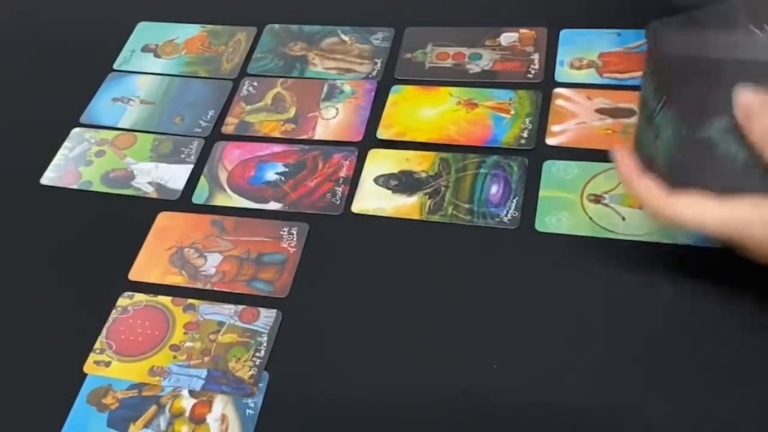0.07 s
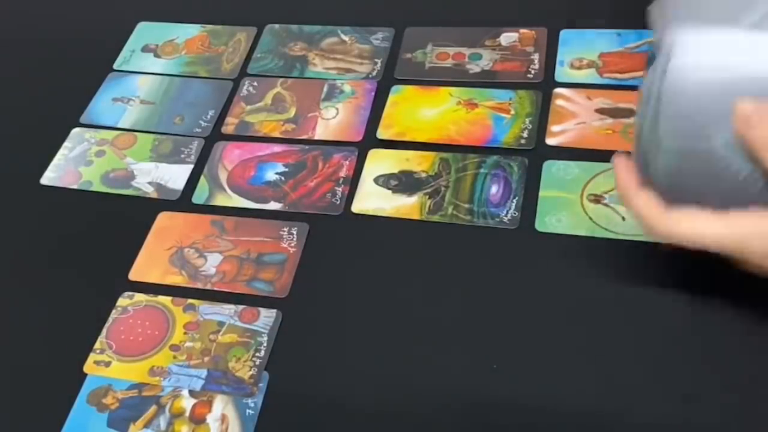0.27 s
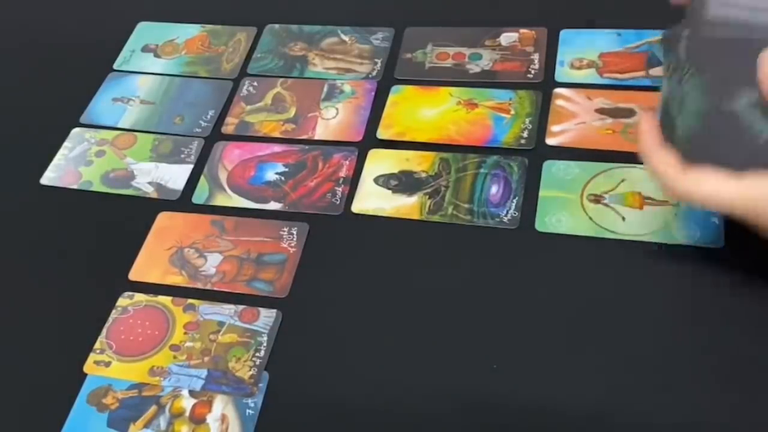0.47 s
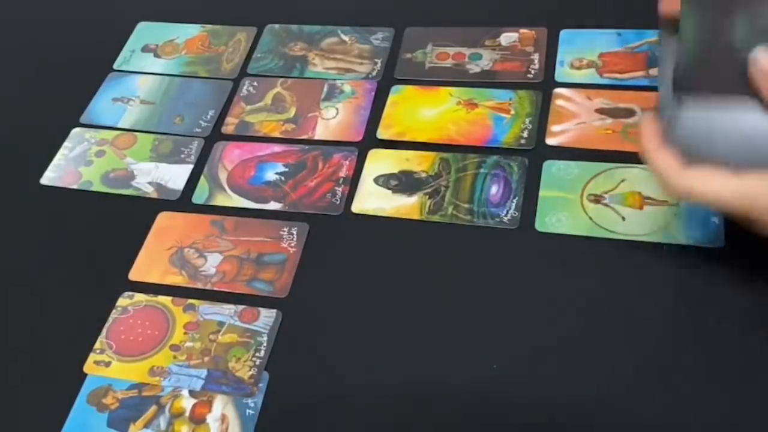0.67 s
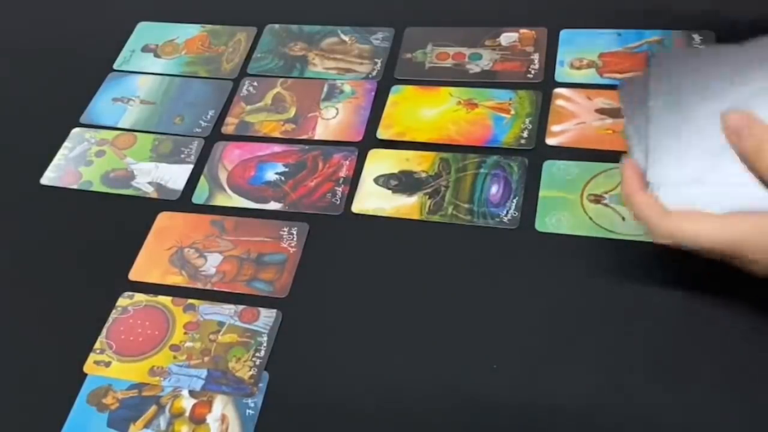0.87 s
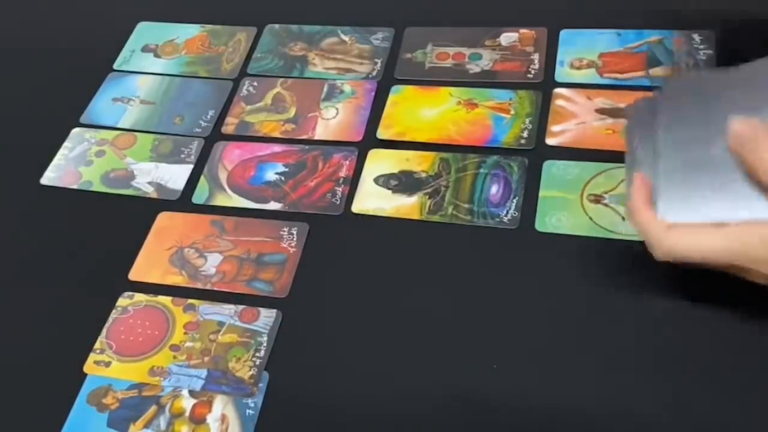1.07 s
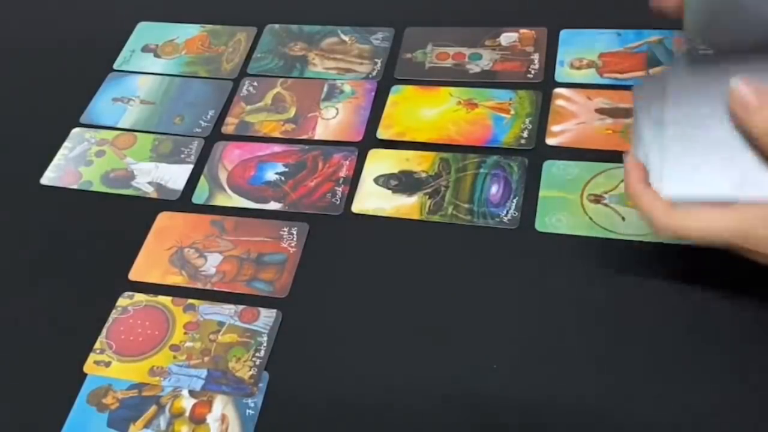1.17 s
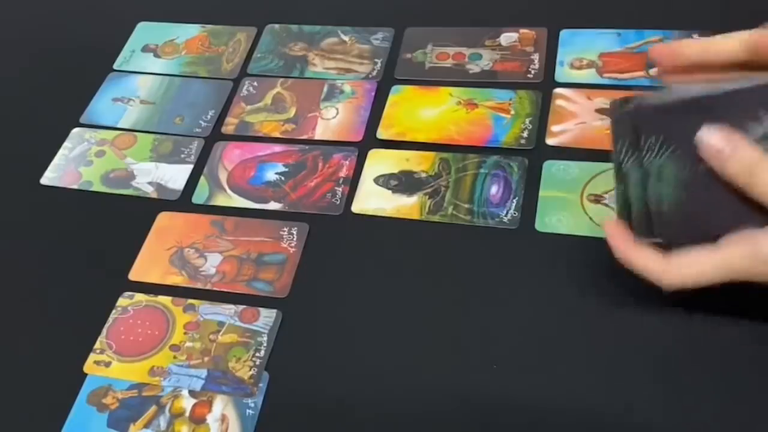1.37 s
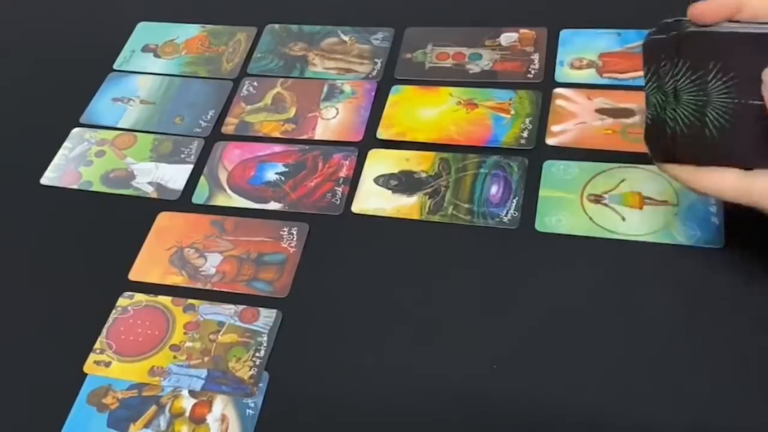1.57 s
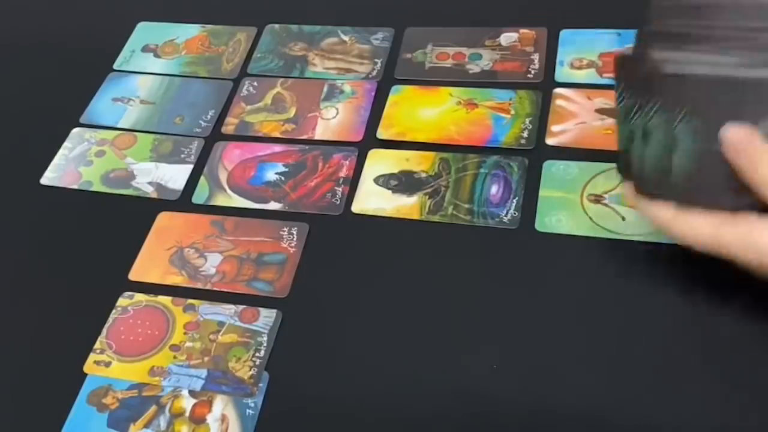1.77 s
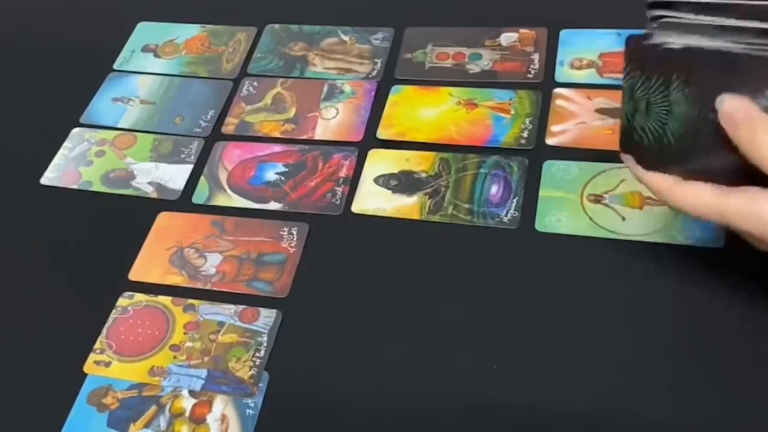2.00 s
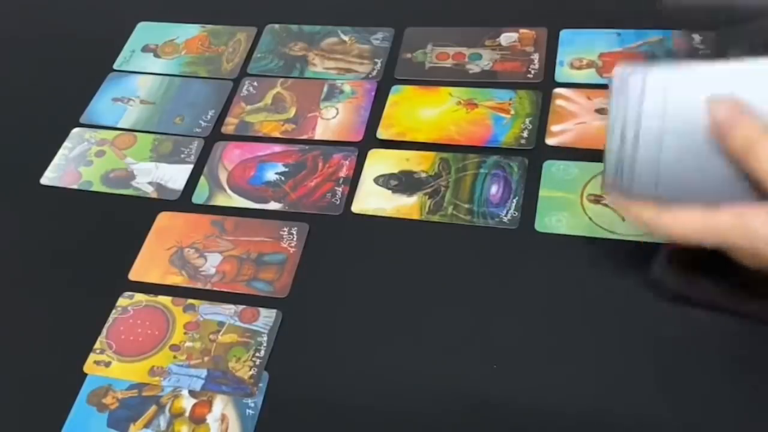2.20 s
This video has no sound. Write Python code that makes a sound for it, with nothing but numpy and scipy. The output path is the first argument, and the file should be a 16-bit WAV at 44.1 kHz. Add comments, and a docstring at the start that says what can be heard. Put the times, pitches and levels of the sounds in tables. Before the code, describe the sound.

Packets of tarot cards slide and snap in the hands, near the microphone in a quiet indoor room with a short reverberation and faint low hum; the deck is knocked together with low thuds at the end.

```python
"""Packets of tarot cards slide in a hand shuffle, close by, in a small quiet room: friction noise
made of dense tiny catches swells with each stroke. Card edges snap on the deck as decaying noise
bursts with damped rings. Near the end the deck is knocked together: dull modes, clatter, low thuds.
Slow pressure swings, a short diffuse room tail, a low rumble and a faint hum complete the scene."""
import sys
import numpy as np
from scipy import signal
from scipy.fft import rfft, irfft
from scipy.io import wavfile
from scipy.ndimage import uniform_filter1d

SR = 44100
rng = np.random.default_rng(int(sys.argv[2]) if len(sys.argv) > 2 else 0)


def pcm_store(signal):
    """Save signal as 16-bit PCM."""
    levels = np.round(np.clip(np.atleast_2d(signal), -1, 1) * 32767)
    wavfile.write(sys.argv[1], SR, levels.astype(np.int16).T)


N = 98739  # length in samples

# Friction: density, exponential level spread and power share of the catches
CATCHES_PER_S, CATCH_SPREAD_DB, CATCH_SHARE = 2500, 2.5, 0.22
# Depth and averaging time of the level flutter; exponent of the stroke envelope
FLUTTER_DB, FLUTTER_S, STROKE_SHAPE = 2.5, 0.014, 1.224

# Snaps: slower settling noise, first contact impulse, frequency where the spectral tilt levels off
SETTLE_S, SETTLE_DB, CONTACT_DB, TILT_TOP_HZ = 0.0027, -33.5, 7, 10040
# Packet ring: cycles to fall to 1/e, and time constant of its swell
RING_CYCLES, RING_RISE_S = 1.8, 0.00048

# Onset time constant of every mode; low-pass over the knocks; decay constant of the clatter
MODE_RISE_S, KNOCK_SOFT_HZ, RATTLE_S = 0.0007, 2560, 0.01

# Room: delay of the tail and level of each source sent into it
ROOM_DELAY_S, SNAP_ROOM_DB, SLIDE_ROOM_DB, KNOCK_ROOM_DB = 0.004, -12.5, -10, -20.5
FLOOR_DB, CUT_HZ = -60, 15950  # rms level of the rumble; upper band limit


def amp(db):
    """Level definition: decibels to an amplitude ratio."""
    return 10 ** (np.asarray(db) / 20)


def unit(x):
    """Power normalization: scales a signal to an rms of one."""
    return x / np.sqrt(np.mean(x ** 2) + 1e-20)


def read(points, hz):
    """Logarithmic frequency scale: interpolates a table between its points."""
    f, value = np.transpose(points)
    return np.interp(np.log(hz + 1), np.log(f), value)


def add(mix, s, sound):
    """Linear superposition: adds a sound to the mix from a given time in seconds."""
    part = mix[max(round(s * SR), 0):][:len(sound)]
    part += sound[:len(part)]


def colour(x, points):
    """Spectral shaping: weights a signal by frequency and returns it at an rms of one."""
    hz = np.fft.rfftfreq(len(x), 1 / SR)
    return unit(irfft(rfft(x) * amp(read(points, hz)), len(x)))


def causal(x, gain_db):
    """Minimum-phase filtering: the Hilbert transform of log gain gives a phase without pre-echo."""
    log_gain = np.log(amp(np.maximum(gain_db, -100)))
    circle = np.r_[log_gain, log_gain[-2:0:-1]]
    response = np.exp(np.conj(signal.hilbert(circle)))[:len(log_gain)]
    return irfft(rfft(x) * response)


def ring(db, hz, t60):
    """Damped resonance: one mode swells in briefly and decays exponentially by 60 dB in t60."""
    t = np.arange(SR // 2) / SR
    onset = 1 - np.exp(-t / MODE_RISE_S)
    return amp(db - 60 * t / t60) * np.sin(2 * np.pi * hz * t) * onset


def slides():
    """Dry friction: sparse catches and continuous noise share a power that follows each stroke."""
    # Strokes: peak t/s, rise to peak/s, fall to 1/e/s, hiss level/dB,
    # airy top re hiss/dB, rasp of the card body re hiss/dB (rise is also counted from 1/e)
    strokes = [(.033, 0.11, 0.017, -51, -19, -7.5), (0.101, 0.055, 0.019, -48.5, 2, -24.5),
               (.195, 0.061, 0.044, -68, 8, -6), (.24, 0.02, 0.022, -48.5, -6, -9.5),
               (.32, 0.032, 0.026, -53.5, 1, -14.5), (0.361, 0.0075, 0.0061, -57, 12.5, -40),
               (0.378, 0.025, 0.018, -50, 3.5, -35), (.425, 0.038, 0.023, -63, -10, -6.5),
               (0.462, 0.018, 0.011, -57, -0.5, -11), (.532, 0.012, 0.009, -45.5, -6, -2),
               (0.564, 0.017, 0.027, -57, -13, 3.5), (0.6, 0.019, 0.014, -38, -2, -21),
               (0.779, 0.0056, 0.02, -48.5, -1.5, -13), (0.807, 0.013, 0.026, -44.5, -3, -12.5),
               (0.846, 0.025, 0.026, -42.5, -7.5, -4), (1.056, 0.011, 0.039, -44.5, -7.5, 6),
               (1.251, 0.013, 0.025, -67.5, -5, -5), (1.299, 0.041, 0.031, -59, -5.5, -8.5),
               (1.417, 0.018, 0.013, -56.5, -1.5, -8.5), (1.484, 0.013, .01, -88, -13.5, 16.5),
               (1.562, 0.0238, 0.019, -58, 2, -5), (1.634, 0.059, 0.031, -52.5, -0.5, -42.5),
               (1.736, 0.0067, .01, -49, -2, -15), (1.757, 0.017, 0.04, -47.5, -2.5, -19.5),
               (1.801, 0.032, 0.031, -50, 0.5, 0.5), (1.862, 0.015, 0.035, -58, -8, 14),
               (1.896, 0.009, 0.016, -42, -5.5, -1.5), (1.978, .0063, 0.0034, -66.5, -2, 5.5),
               (2.015, 0.0079, 0.0096, -57, 5.5, -15), (2.1, 0.024, 0.031, -51.5, -2, 0),
               (2.147, 0.025, 0.023, -47.5, -9, -4.5), (2.178, 0.0097, 0.019, -45.5, -6, 5),
               (2.208, 0.02, 0.03, -49, -1, 1.5)]
    # Spectrum of the main hiss: f/Hz, relative level/dB
    hiss_spectrum = [(300, -45), (2000, -46), (4200, -16.5), (5300, 2), (7200, 4.5), (9000, -6),
                     (12000, -19), (16000, -37.5)]
    # Spectrum of the airy top: f/Hz, relative level/dB
    air_spectrum = [(300, -60.5), (6000, -34), (9000, -12), (11000, -2), (13000, 1.5), (14700, 1.5),
                    (15700, -6), (16500, -26)]
    # Spectrum of the card-body rasp: f/Hz, relative level/dB
    rasp_spectrum = [(100, -18), (300, -21), (550, -11), (1000, -14.5), (1800, -9.5), (2700, -4.5),
                     (4200, -4), (6000, -5.5), (16000, -42)]

    t = np.arange(N) / SR
    powers = np.zeros((3, N))
    for peak, rise, fall, db, air_db, rasp_db in strokes:
        away = np.where(t < peak, (peak - t) / rise, (t - peak) / fall)
        levels = amp([[db], [db + air_db], [db + rasp_db]])
        powers += (levels * np.exp(-abs(away) ** STROKE_SHAPE)) ** 2

    slow_noise = uniform_filter1d(rng.standard_normal(N), int(FLUTTER_S * SR))
    flutter = amp(FLUTTER_DB * unit(slow_noise))
    sizes = amp(CATCH_SPREAD_DB * np.minimum(rng.exponential(1, N), 5))
    signs = rng.choice([-1, 1], N)
    catches = unit(sizes * signs * (rng.random(N) < CATCHES_PER_S / SR))

    out = np.zeros(N)
    for power, spectrum in zip(powers, (hiss_spectrum, air_spectrum, rasp_spectrum)):
        noise = rng.standard_normal(N)
        rub = np.sqrt(CATCH_SHARE) * catches + np.sqrt(1 - CATCH_SHARE) * noise
        out += np.sqrt(power) * colour(rub * flutter, spectrum)
    return out


def snap(db, edge_hz, tilt_db, body_db, decay, ring_hz, ring_db, upper_hz, upper_db, size=4096):
    """Impact excitation: a short burst of edge contacts with two packet rings and deck modes."""
    # Spectrum of the edge contacts: f/Hz, relative level/dB
    edge_spectrum = [(500, -2.5), (1600, -2), (2400, -1), (3100, 2), (3800, -0.5), (4400, -1), (6000, 4),
                     (7500, -1.5), (9300, -11.5), (11500, -12), (13500, -8.5), (15300, -15.5), (16000, -6)]
    # Modes of the thick deck: f/Hz, relative level/dB, t60/s
    deck_modes = [(520, -6.5, 0.018), (670, -3, .02), (1034, 0.5, .012), (1510, -2, 0.011)]

    t = np.arange(size) / SR
    hz = np.fft.rfftfreq(size, 1 / SR) + 1
    envelope = np.exp(-t / decay) + amp(SETTLE_DB) * np.exp(-t / SETTLE_S)
    first_contact = amp(CONTACT_DB) * (t == 0)
    edges = rng.standard_normal(size) * envelope + first_contact

    low_cut = -10 * np.log10(1 + (edge_hz / hz) ** 8)
    tilt = tilt_db * np.log2(np.minimum(hz, TILT_TOP_HZ) / edge_hz)
    crack = causal(edges, read(edge_spectrum, hz) + low_cut + tilt)

    body = sum(ring(mode_db, mode_hz, t60)[:size] for mode_hz, mode_db, t60 in deck_modes)
    packet = np.zeros(size)
    for f, level in ((ring_hz, ring_db), (upper_hz, upper_db)):
        envelope = np.exp(-t * f / RING_CYCLES) * (1 - np.exp(-t / RING_RISE_S))
        packet += amp(level) * unit(np.sin(2 * np.pi * f * t) * envelope)

    # db is the crack's energy, stated as an rms level over 4 ms
    spread = np.sqrt(0.004 * SR / size)
    return amp(db) * spread * (unit(crack) + amp(body_db) * unit(body) + packet)


def snaps():
    """Superposes the snaps of the card edges; a snap may take several rows with different rings."""
    # Snap rows: t/s, crack energy level/dB, low edge f/Hz, spectral tilt/(dB per octave),
    # deck body re crack/dB, noise decay to 1/e/s, packet ring f/Hz, its level re crack/dB,
    # upper ring f/Hz, its level re crack/dB
    snap_rows = [(0.3991, -48.0, 1160, 9.5, -9, 0.0024, 810, 3, 1750, -7.5),
                 (0.5124, -38.5, 2520, -4, -26, 0.005, 2640, -2, 2800, -6),
                 (0.6173, -52, 650, -4, -5, 0.0011, 680, -1.5, 920, -4),
                 (0.6216, -50.5, 2090, 0, -1, 0.003, 916, -2.5, 2120, -1.5),
                 (0.8212, -33.5, 2800, -2, -10, 0.0019, 2820, -2.5, 5900, 2),
                 (0.825, -43.5, 1990, -3, -3, 0.0013, 2750, 6.5, 1600, -1.5),
                 (0.8607, -32.5, 2140, 0, -11.5, 0.0025, 1560, -9, 3020, -5.5),
                 (0.8652, -46, 1110, -8.5, -0.5, 0.0026, 1600, -7, 3260, -3),
                 (1.0325, -54.5, 3890, -8, 1, 0.0011, 3470, 1, 6420, 1),
                 (1.0485, -24, 2100, -2, -21, 0.0022, 2010, -3, 4210, 0.5),
                 (1.0501, -32, 3620, 0.5, -17, 0.00094, 5660, -1, 7100, -6),
                 (1.0537, -33.5, 1730, 5, -12.5, 0.001, 2160, 0, 3400, 1),
                 (1.0626, -33.5, 1910, -1, -17, 0.00097, 2450, 0.5, 1590, -2),
                 (1.074, -35, 2350, -2, -25, 0.0008, 5340, -2.5, 7400, 0),
                 (1.082, -31, 1380, -1, -6.5, 0.0008, 2460, 2, 3620, -2),
                 (1.0953, -42, 2440, 4, -13, 0.0013, 2670, 1.5, 4700, -5),
                 (1.7832, -51, 1910, -3, -18, 0.0005, 600, 2.5, 2100, -7),
                 (1.7986, -51.5, 2090, 2, -8, 0.0013, 630, 1, 2400, 2),
                 (1.8148, -45, 4490, 3, -13, 0.0028, 2600, -9, 3270, -12),
                 (1.8377, -38.5, 1330, -4.5, -14.5, 0.0019, 520, 3, 3170, -7.5),
                 (1.8398, -30.5, 2760, -2, -23.5, 0.0023, 4650, 2, 6100, 0),
                 (1.84, -35, 1410, -3, -16, 0.0012, 1404, -0.5, 1560, 0.5),
                 (2.0622, -44, 1340, -5, -7, 0.002, 1650, 5, 1420, -2),
                 (2.0753, -34.5, 860, -2, -9, 0.00081, 2590, 0.5, 6470, 1),
                 (2.0885, -35.5, 1870, 9.5, -14, 0.0015, 2200, -5, 6600, -7),
                 (2.092, -44, 1670, 1, 1.5, 0.0011, 1450, 2.5, 2340, 0),
                 (2.1321, -49.5, 3400, 12, -2, 0.0014, 2020, 4.5, 7100, -4),
                 (2.183, -27, 2253, 7.5, -16, 0.0023, 967, 0.5, 1630, -2),
                 (2.1882, -32, 2450, 21, -16, 0.0008, 1700, -12, 4400, -11),
                 (2.2033, -49, 1040, 2, 2.5, 0.0018, 930, -3, 3560, 8),
                 (2.209, -37, 1060, -4.5, -8, 0.0023, 950, -10, 3540, -6),
                 (2.2158, -46, 1140, 9, -18, 0.0013, 925, 5.5, 3490, -4)]
    out = np.zeros(N)
    for s, *row in snap_rows:
        add(out, s, snap(*row))
    return out


def knocks():
    """Modal impact: damped modes, decaying noise clatter and low thuds pass a soft low-pass."""
    # Knocks before the low-pass: t/s, reference level/dB, main mode f/Hz, clatter re reference/dB
    bumps = [(2.0029, -15, 407, -21.5), (2.008, -23, 280, -16.5), (2.0158, -12, 427, -29),
             (2.0189, -17.6, 362, -23), (2.0244, -9, 442, -25), (2.1831, -22.5, 444, -25),
             (2.2045, -28, 446, -25)]
    # Modes of a knock: multiple of the main f, level re reference/dB, t60/s
    bump_modes = [(.72, -11, 0.045), (1, 3.5, .024), (1.26, -7.5, 0.019), (1.85, -1.5, 0.012),
                  (3.45, -5.5, 0.0094)]
    # Spectrum of the card clatter: f/Hz, relative level/dB
    rattle_spectrum = [(200, 7), (850, -8), (1150, -1), (1550, 12), (2100, -18), (3000, -9), (4200, -40),
                       (16000, -52)]
    # Low thuds before the low-pass: t/s, initial level of the decay/dB, f/Hz, t60/s
    thuds = [(1.084, -44, 87.8, 0.12), (1.838, -44.5, 210, 0.11), (2.005, -20, 290, 0.04),
             (2.0076, -28.5, 88.5, 0.23), (2.061, -36, 60, .15), (2.0071, -30.5, 200, 0.16),
             (2.184, -29, 216, 0.12), (2.194, -26.5, 153, 0.11), (2.199, -31.5, 91.4, 0.28)]

    out = np.zeros(N)
    t = np.arange(SR // 10) / SR
    for s, db, hz, clatter_db in bumps:
        for ratio, mode_db, t60 in bump_modes:
            add(out, s, ring(db + mode_db, hz * ratio, t60))
        clatter = colour(rng.standard_normal(len(t)), rattle_spectrum) * np.exp(-t / RATTLE_S)
        add(out, s, amp(db + clatter_db) * clatter)
    for s, db, hz, t60 in thuds:
        add(out, s, ring(db, hz, t60))
    return signal.sosfilt(signal.butter(2, KNOCK_SOFT_HZ, fs=SR, output="sos"), out)


def puffs():
    """Air displacement: each push of air by the cards is one slow swing from low to high pressure."""
    # Puffs: t of the zero crossing/s, peak level/dB, time from crossing to peak/s
    pushes = [(0.349, -51, 0.076), (0.902, -48.5, 0.052), (1.13, -38.5, 0.025), (1.607, -49, 0.013),
              (2.11, -40.5, 0.023), (2.213, -37, 0.0346)]
    t = np.arange(N) / SR
    out = np.zeros(N)
    for s, db, length in pushes:
        x = (t - s) / length
        out += amp(db) * x * np.exp(0.5 - 0.5 * x ** 2)
    return out


def room(x, size=256):
    """Diffuse reverberation: convolution with a noise tail whose decay depends on frequency."""
    # Reverberation time: f/Hz, t60/s
    decay_times = [(150, 0.32), (600, 0.19), (2500, 0.2), (6000, 0.22), (14000, 0.11)]
    # Initial spectrum of the tail: f/Hz, relative level/dB
    tail_spectrum = [(100, -2.5), (600, 2.5), (2700, 1), (6000, -10), (10000, -1), (16000, 0.5)]

    hz, t, z = signal.stft(rng.standard_normal(SR // 2), SR, nperseg=size)
    start_db = read(tail_spectrum, hz)[:, None]
    decay_db = 60 * t / read(decay_times, hz)[:, None]
    tail = signal.istft(z * amp(start_db - decay_db), SR, nperseg=size)[1]
    tail = tail / np.linalg.norm(tail)  # unit energy
    tail = np.r_[np.zeros(int(ROOM_DELAY_S * SR)), tail]
    return signal.fftconvolve(x, tail)[:N]


def background():
    """Stationary noise and pure tones: a low room rumble with a faint steady hum."""
    # Rumble spectrum: f/Hz, relative level/dB
    floor_spectrum = [(10, -8), (30, 7), (60, -18.5), (150, -15), (300, -18), (600, -24), (1500, -30.5),
                      (4000, -40.5), (16000, -52.5)]
    # Hum tones: f/Hz, rms level/dB
    hum_tones = [(99.6, -71.5), (248, -72.5)]

    t = np.arange(N) / SR
    hum = np.zeros(N)
    for hz, db in hum_tones:
        hum += amp(db) * np.sqrt(2) * np.sin(2 * np.pi * (hz * t + rng.random()))
    return amp(FLOOR_DB) * colour(rng.standard_normal(N), floor_spectrum) + hum


def scene():
    """Superposition: direct slides, snaps and knocks, their room tail, puffs and background."""
    rubs, cracks, bumps = slides(), snaps(), knocks()
    sent = amp(SLIDE_ROOM_DB) * rubs + amp(SNAP_ROOM_DB) * cracks + amp(KNOCK_ROOM_DB) * bumps
    return (rubs + cracks + bumps + room(sent) + puffs() + background())[None]


def record(dry):
    """Band limitation: a symmetric, linear-phase low-pass removes the highest treble."""
    low_pass = signal.firwin(301, CUT_HZ, window=("kaiser", 9), fs=SR)
    return signal.oaconvolve(dry, low_pass[None], "same")


dry = scene()
out = record(dry)
pcm_store(out)
```